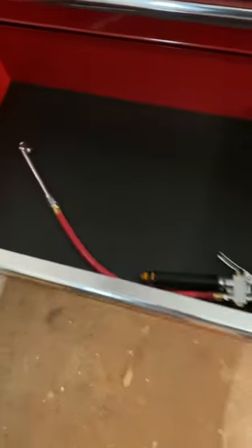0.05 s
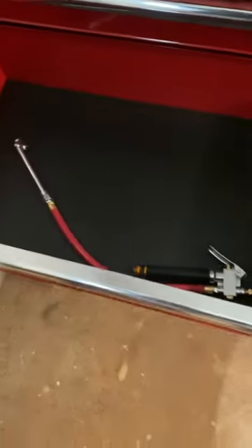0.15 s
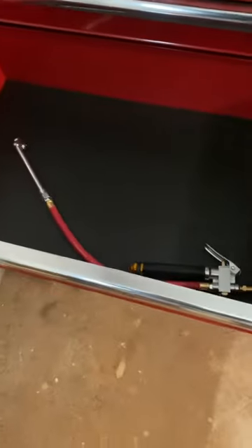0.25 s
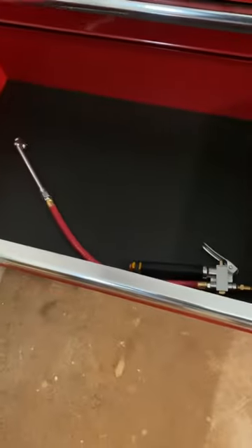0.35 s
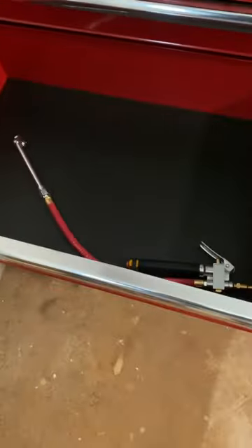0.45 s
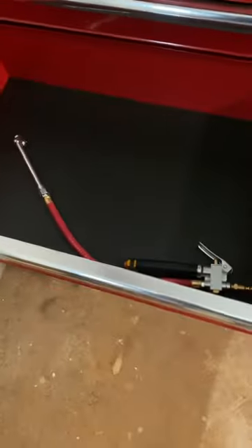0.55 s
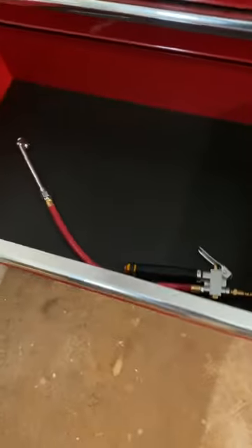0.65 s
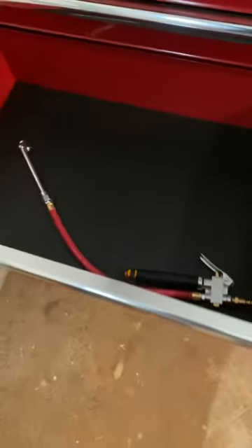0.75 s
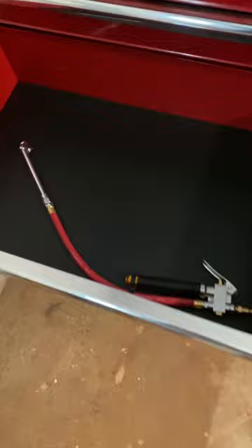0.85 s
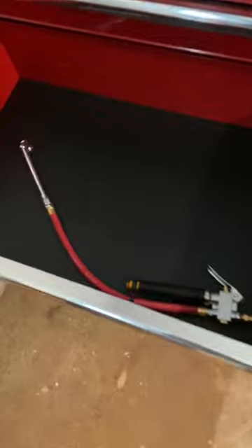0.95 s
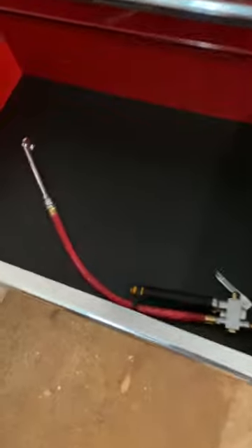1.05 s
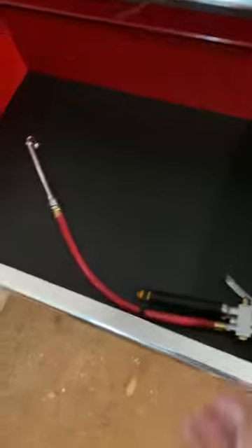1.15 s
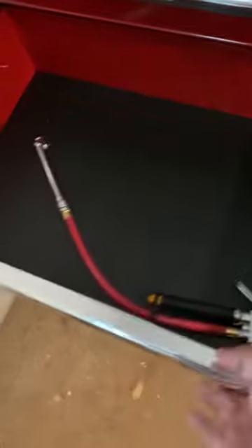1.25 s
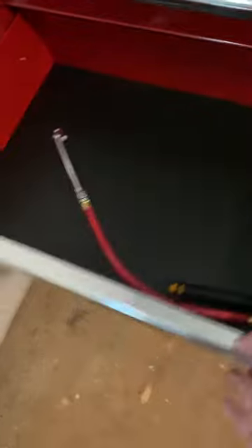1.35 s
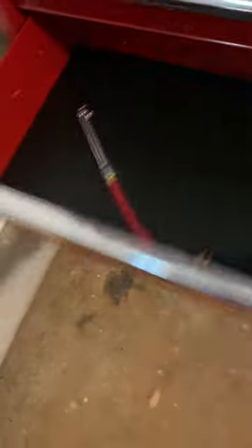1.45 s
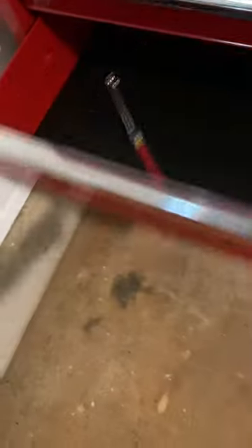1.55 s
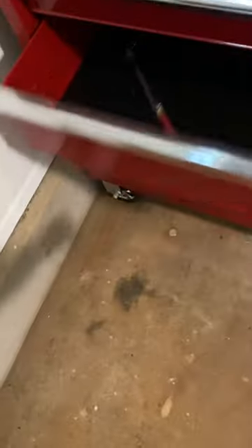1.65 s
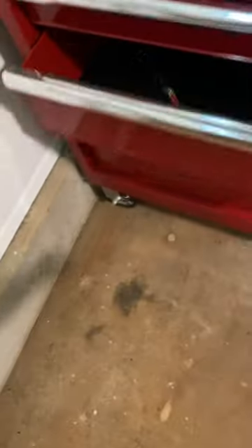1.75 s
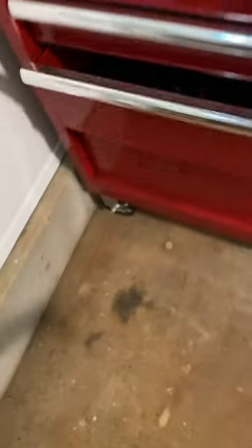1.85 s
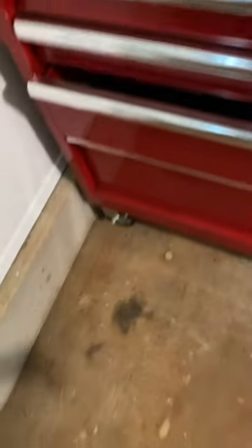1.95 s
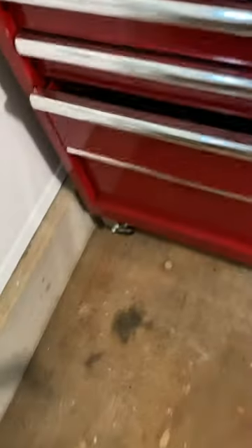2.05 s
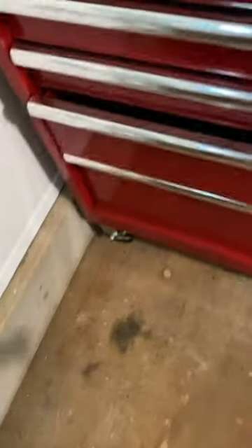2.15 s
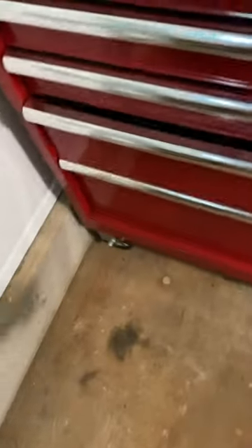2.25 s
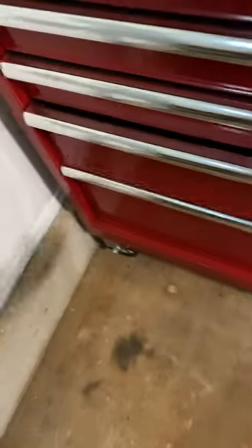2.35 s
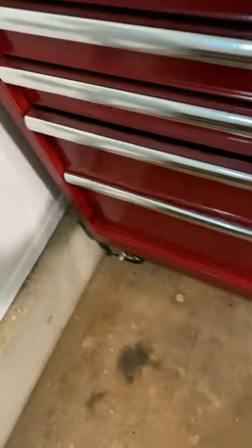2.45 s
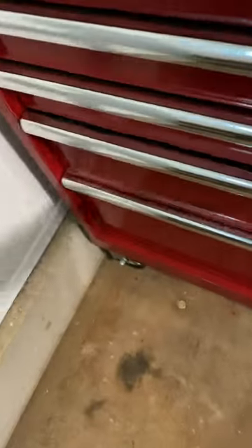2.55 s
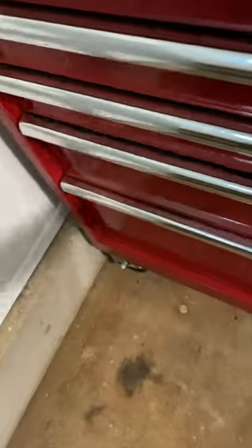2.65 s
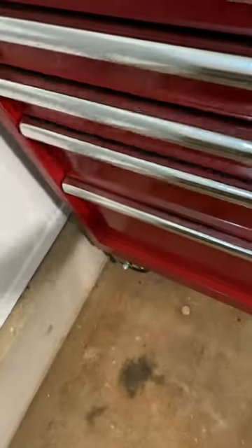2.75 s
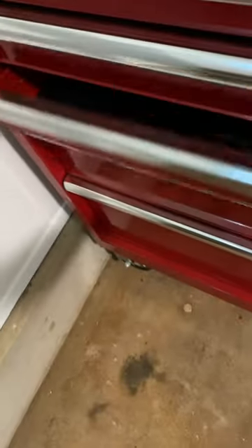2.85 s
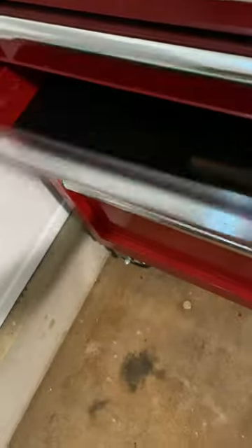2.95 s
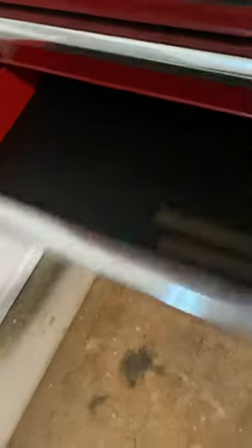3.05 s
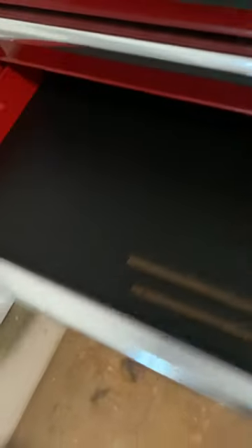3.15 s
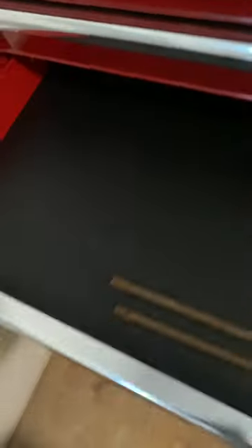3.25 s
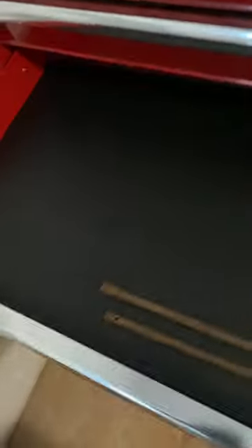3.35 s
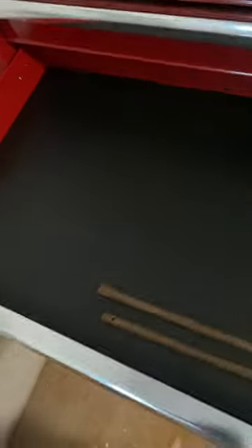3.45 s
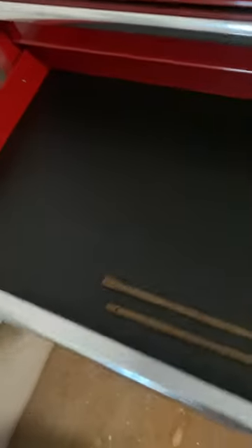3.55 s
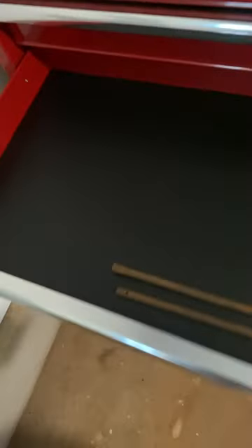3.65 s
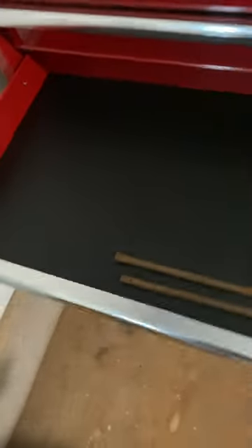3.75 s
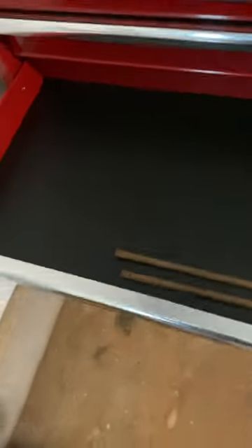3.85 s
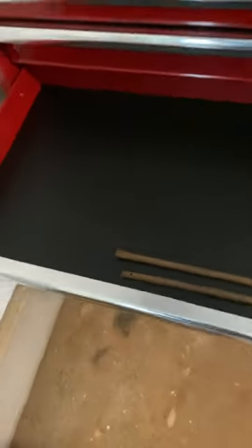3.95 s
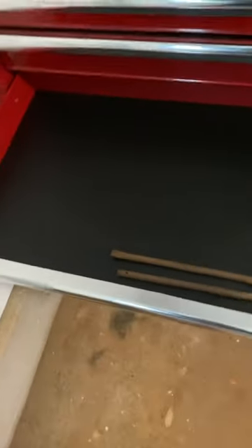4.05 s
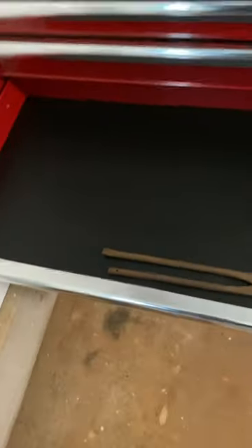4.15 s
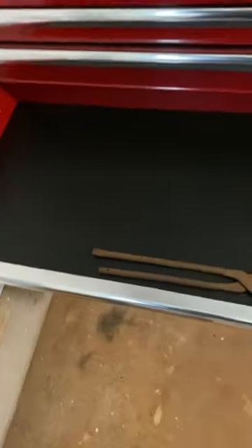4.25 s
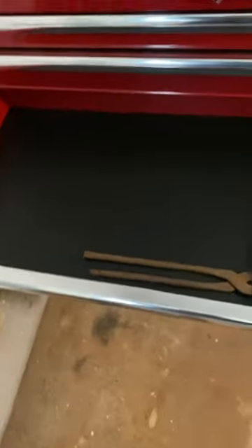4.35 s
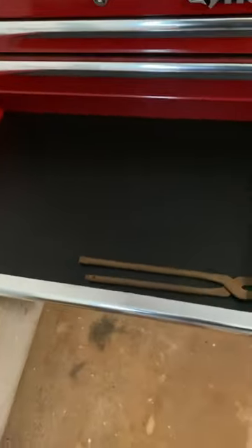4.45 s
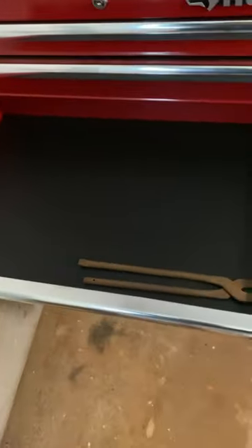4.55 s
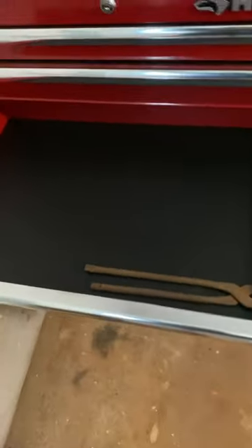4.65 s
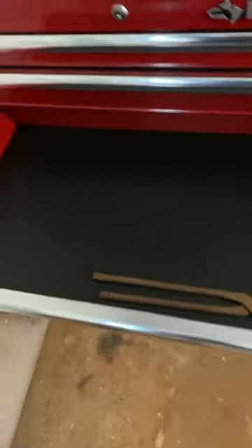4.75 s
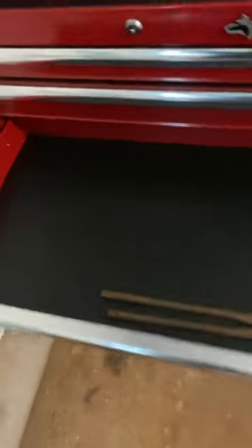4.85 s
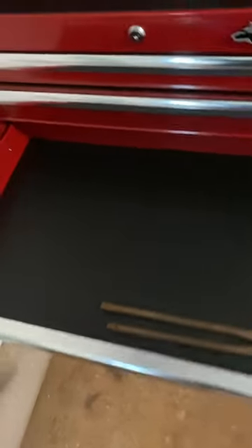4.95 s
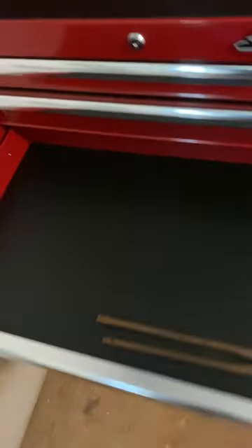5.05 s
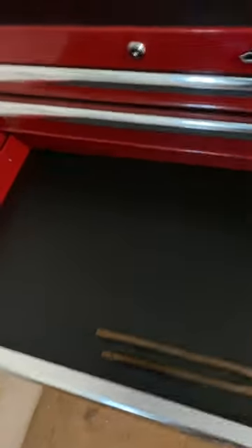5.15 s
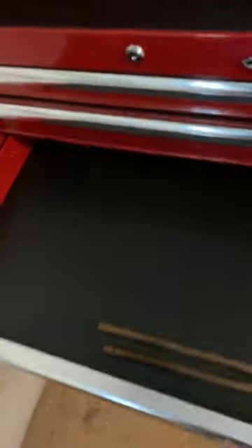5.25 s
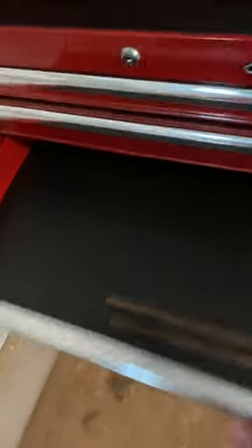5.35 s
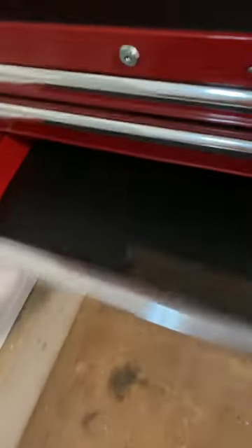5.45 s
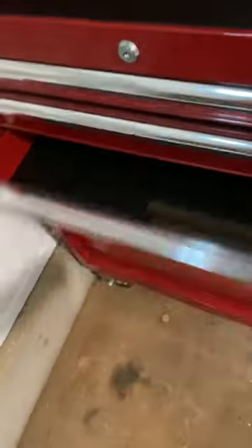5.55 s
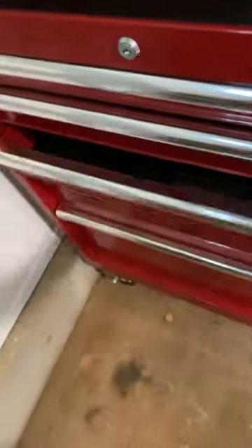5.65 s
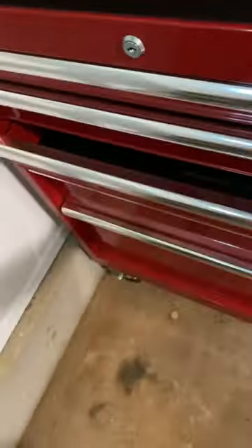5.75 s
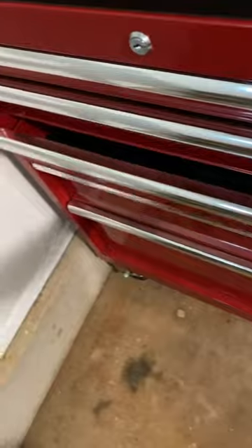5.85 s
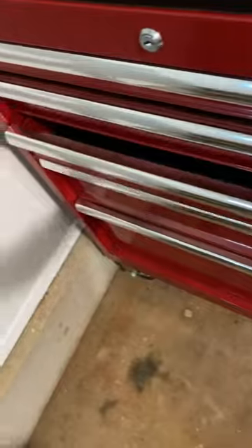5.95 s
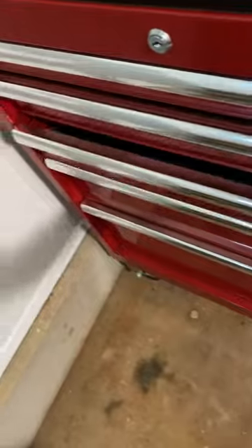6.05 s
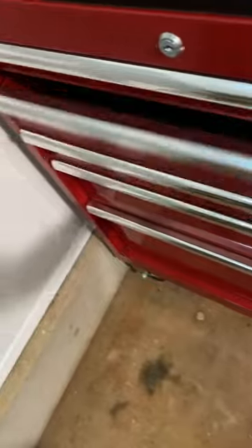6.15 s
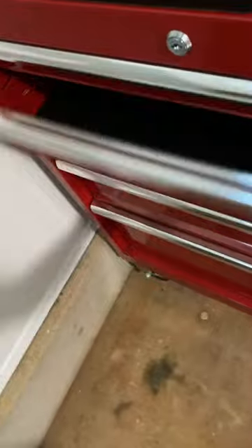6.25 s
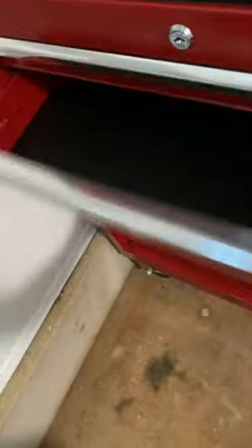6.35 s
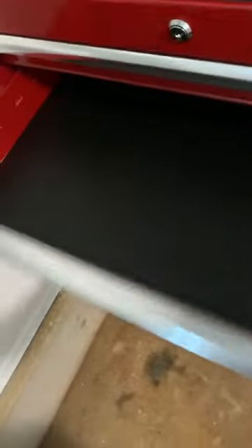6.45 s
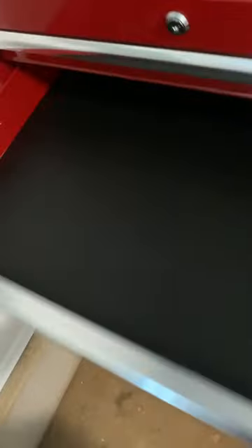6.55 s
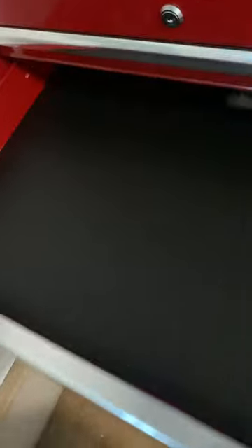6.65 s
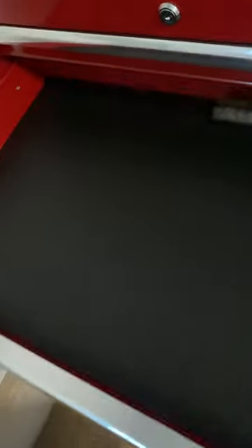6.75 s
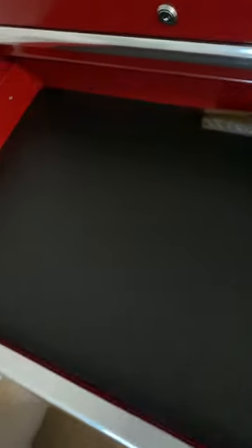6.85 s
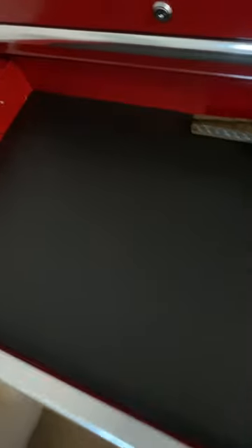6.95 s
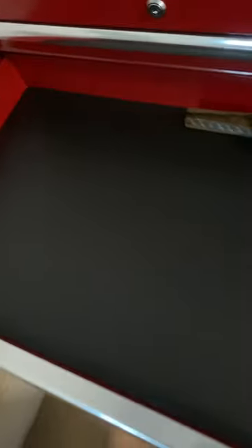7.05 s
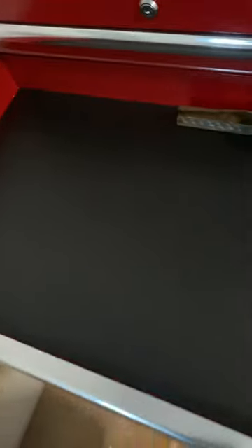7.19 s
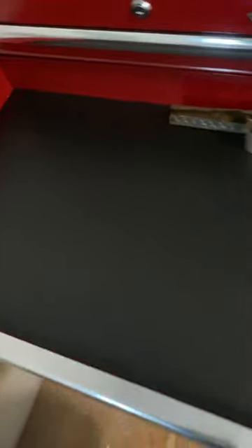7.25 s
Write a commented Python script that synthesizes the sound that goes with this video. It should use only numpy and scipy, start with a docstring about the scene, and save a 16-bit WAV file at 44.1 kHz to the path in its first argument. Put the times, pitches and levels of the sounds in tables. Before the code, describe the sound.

A steel tool chest heard close up in a reverberant garage, over faint still air and a low hum. The first second is nearly quiet, with a tiny knock at 0.1 s and a dry tick at 0.7. From about 1.2 s a latch clicks and a drawer rolls shut, ball slides hissing and thin panels humming, ending in a bright clack and hollow boom at 1.8. Small rattling ticks follow at 2.2-2.5. At 2.7 another drawer rolls open quickly, hitting its stop with a thud near 3.05, then a clack at 3.4. Quiet until 5, with light ticks and soft gritty shoe scuffs at 3.8, 4.7 and 5. From 5.1 the drawer rolls back, its steel singing, and slams hard at 5.6. Clicks at 5.9-6.05 lead into a rattly pull open, stopping with a hollow bang at 6.5. Loose metal clacks and ticks around 6.8-7.05 s fade out.

```python
"""In a hard-walled garage, the steel drawers of a tool chest roll in and out on ball slides, heard close by.
Rolling balls shake the sheet-steel panels (ringing filters) and hiss (coloured random clicks).
Slide stops, latches and loose tools clack in short rattles, dry ticks and single blows.
Shoes scuff the concrete. The cabinet booms, the room rings on in a fading noise tail,
and still air and a faint hum (wavering sines) lie under everything."""
import sys
import numpy as np
from scipy import signal
from scipy.fft import rfft, irfft, next_fast_len
from scipy.io import wavfile

SR = 44100
rng = np.random.default_rng(int(sys.argv[2]) if len(sys.argv) > 2 else 0)


def generate_wav(signal):
    """Clip the signal to [-1, 1] and save it as 16-bit WAV at the path in sys.argv[1]."""
    frames = np.transpose(np.atleast_2d(signal))
    scaled = np.clip(frames, -1, 1) * 32767
    pcm = np.round(scaled).astype(np.int16)
    wavfile.write(sys.argv[1], SR, pcm)


N = 322812  # length of the scene in samples

# rattling contacts of steel on steel, with relative levels: start_s [s], click_db (bright click) [dB],
# snap_db (very high snap) [dB], crunch_db (lower crunch) [dB]
CONTACTS = [(0.097, -54, -79, -48.5), (1.155, -54, -67, -64), (1.2213, -36, -63, -57),
            (1.256, -35, -62, -58), (1.314, -35, -54, -50), (1.3403, -32.5, -62, -53),
            (1.482, -36.5, -81, -63), (1.571, -38, -68, -54), (1.6457, -27.5, -42, -37),
            (1.8042, -26, -49, -38.5), (1.8172, -16, -32, -28), (1.825, -19, -43, -29.5),
            (1.834, -33, -54, -27.5), (2.196, -50, -49, -49), (2.212, -44, -63, -56),
            (2.226, -42, -58, -54), (2.236, -37, -46, -48), (2.2467, -26, -56, -51),
            (2.524, -32.5, -75, -42), (2.7019, -29, -57, -39.5), (2.7122, -34, -54, -36.5),
            (2.8695, -28.5, -62, -39), (2.8835, -49, -63, -45), (3.027, -26.5, -54, -31.5),
            (3.0404, -51, -62, -49), (3.1235, -68, -43, -56), (3.3723, -31.5, -63, -39),
            (3.4422, -46, -72, -53), (3.501, -37, -64, -52.5), (4.036, -33.5, -60, -48.5),
            (4.048, -32, -53, -39), (4.9545, -49, -66, -52), (5.0843, -52, -67, -55),
            (5.439, -29, -48, -41), (5.496, -31, -60, -60), (5.544, -34, -51, -36.5),
            (5.602, -13.5, -46, -31), (5.6066, -11, -49, -37), (5.6112, -16.5, -53, -22.5),
            (5.9, -32.5, -69, -36.5), (5.912, -38, -58, -41), (6.021, -39, -58, -51),
            (6.0387, -34, -65, -37), (6.06, -15, -53, -33.5), (6.079, -43, -56, -31.5),
            (6.1332, -31, -54, -45), (6.201, -37, -44, -33.5), (6.2134, -18.5, -48, -28),
            (6.351, -42, -68, -40.5), (6.4882, -40, -65, -45), (6.5087, -42, -68, -46),
            (6.786, -46, -51, -51), (6.9514, -31, -50, -57), (6.9658, -26, -37, -38),
            (7.006, -31, -44, -49), (7.0293, -25.5, -63, -36), (7.0444, -53, -64, -33),
            (7.0614, -44, -65, -52)]
# drawer speed heard as rolling strength, one list per slide (shut, open, shut, open):
# time_s [s], level_db [dB, relative]
SLIDE_SPEEDS = [
    [(1.15, -80), (1.25, -49), (1.32, -39.5), (1.42, -34.5), (1.52, -36.5), (1.62, -38.5), (1.75, -39.5),
     (1.83, -40.5)],
    [(2.68, -61), (2.71, -46), (2.78, -44.5), (2.88, -40.5), (2.96, -42), (3.036, -40)],
    [(5.09, -76), (5.16, -56), (5.23, -41.5), (5.29, -44), (5.36, -39), (5.45, -37), (5.53, -36),
     (5.612, -35)],
    [(6.05, -43), (6.07, -37.5), (6.13, -38.5), (6.214, -34.5), (6.27, -40), (6.42, -39), (6.519, -37.5)],
]


def from_db(db):
    """Turn decibels into a gain."""
    return 10 ** (np.asarray(db) / 20)


def rms_one(x):
    """Scale a signal so that its average strength (rms) is 1."""
    return x / np.sqrt(np.mean(x ** 2) + 1e-20)


def in_time(rows):
    """Draw every column as a curve over all samples; outside the rows it is silent (-200 dB)."""
    times_s, *columns = np.transpose(rows)
    return [np.interp(np.arange(N) / SR, times_s, column, -200, -200) for column in columns]


def at_hz(points, hz):
    """Read the second column of a table at any pitch, on a log-frequency axis."""
    table = np.array(points)
    return np.interp(np.log(hz), np.log(table[:, 0]), table[:, 1])


def drift(rate_hz):
    """Smooth random wandering with spread 1: noise through two equal low-pass poles, one value per 40 samples."""
    pole = np.exp(-2 * np.pi * rate_hz * 40 / SR)
    noise = rng.standard_normal(N // 40 + 2002)
    slow = signal.lfilter([1], [1, -2 * pole, pole * pole], noise)[2000:]  # skip the filter's start
    return np.interp(np.arange(N) / 40, np.arange(len(slow)), rms_one(slow))


def ring(force, hz, t60_s):
    """One vibration mode: a unit click starts a sine of height 1 that fades by 60 dB in t60_s."""
    decay = from_db(-60 / (t60_s * SR))
    turn = 2 * np.pi * hz / SR
    return signal.lfilter([0, np.sin(turn)], [1, -2 * decay * np.cos(turn), decay * decay], force + 1e-18)


def coloured(x, spectrum):
    """Minimum-phase filter with the table's spectrum; white input keeps its power."""
    size = next_fast_len(N + 8192)
    filter_hz = np.maximum(np.arange(2049) * SR / 4096, 1)
    log_gain = np.log(from_db(at_hz(spectrum, filter_hz)))
    # folding the cepstrum forward in time puts the filter's energy as early as possible
    folded = irfft(log_gain) * np.r_[1, 2 * np.ones(2047), 1, np.zeros(2047)]
    response = irfft(np.exp(rfft(folded)))
    response = response / np.sqrt(np.sum(response ** 2))
    return irfft(rfft(x, size) * rfft(response, size), size)[:N]


def grains(per_s, spread_db):
    """Random clicks of uneven size and sign, scaled to rms 1."""
    sizes = from_db(spread_db * np.minimum(rng.exponential(1, N), 4)) * rng.choice([-1, 1], N)
    return rms_one(sizes * (rng.random(N) < per_s / SR))


def swell(rise_s, dying_s):
    """A loudness shape with a straight rise and an exponential fall."""
    t = np.arange(round(.25 * SR)) / SR
    rise = np.minimum(t / max(rise_s, 2e-4), 1)
    return rise * np.exp(-np.maximum(t - rise_s, 0) / max(dying_s, 1e-3))


def laid_out(shapes, level_db):
    """Place all (start sample, shape) pairs on one time line, each at its own level."""
    line = np.zeros(N + SR)
    for (at, shape), gain in zip(shapes, from_db(level_db)):
        line[at:at + len(shape)] += gain * shape
    return line[:N]


def clicks_at(times_s, level_db):
    """Single-sample pushes at the given times."""
    line = np.zeros(N)
    line[np.round(times_s * SR).astype(int)] = from_db(level_db)
    return line


def background():
    """Still air is coloured noise; the hum is a few sines that waver in level."""
    # spectrum of the air: pitch_hz [Hz], level_db [dB per Hz, relative]
    air_spectrum = [(15, -28), (25, -4), (108, -4), (149, -7.5), (180, -2.5), (206, -10), (476, -12.5),
                    (641, -30), (988, -19), (1190, -30), (1740, -49), (7710, -24.5), (16000, -51)]
    # tones of the hum: pitch_hz [Hz], level_db (height of the sine) [dB]
    hum_tones = [(172.3, -92), (479.1, -73.5), (726.7, -112), (963.6, -74), (1798, -82.5)]
    t = np.arange(N) / SR
    hum = sum(from_db(level_db + 1.0 * drift(7.2)) * np.sin(2 * np.pi * (hz * t + rng.random()))
              for hz, level_db in hum_tones)
    return from_db(-60) * coloured(rng.standard_normal(N), air_spectrum) + hum


def rolling_db():
    """Drive of the six parts over time: the powers of rest, rolling slides, dying jolts and hiss swells add up."""
    # All levels here are relative. The six parts, in this order in every table:
    # cabinet boom, side wall, drawer pan, front panel, track, ball hiss.
    # direction of each slide: closing [1 = pushed shut, 0 = pulled open]
    closings = [1, 0, 1, 0]
    # how each slide's rolling reaches the parts when the drawer is home: six part levels [dB]
    home_levels_db = [(-14, 5, -1, -1, -6.5, -10), (12.5, 3, 0.5, -0.5, 0.5, -2.5),
                      (-10, 3, -6.5, -3.5, -1, -8.5), (2.5, 12.5, -0.5, -1, -6.5, -9)]
    # change in each part when the drawer is fully out: six part levels [dB]
    drawn_out_db = [-21, -41, -4.5, 2, 1.5, -4]
    # jolts that leave the chest shaking: start_s [s], then six part start levels [dB]
    shaking_jolts = [(0.0, -50.5, -48.5, -53, -59, -54, -56), (1.828, -35.5, -34.5, -36, -34.5, -40.5, -40),
                     (2.36, -61, -49.5, -65, -68, -76, -67), (2.53, -59, -55, -53, -48, -52, -62),
                     (3.039, -40, -32, -30.5, -30, -29, -42.5), (3.361, -51, -41, -48, -45.5, -44.5, -59),
                     (3.64, -55, -47, -62, -73, -77, -74), (4.05, -60, -59.5, -60, -71, -69, -56),
                     (5.611, -40.5, -30, -29, -33.5, -33, -35.5),
                     (6.518, -49, -38.5, -31.5, -32, -36.5, -47.5),
                     (6.761, -64, -70, -47, -46, -48.5, -56.5), (6.929, -48, -48, -40, -48, -50.5, -48),
                     (7.01, -43, -39.5, -52, -48, -54, -69)]
    # how fast each part settles: six speeds [dB per s]
    settling_db_per_s = [47.5, 62, 70.5, 74, 74, 43.7]
    # each part at rest: six part levels [dB]
    resting_db = [-73, -75, -74.5, -70.5, -80, -64]
    # a weaker share of each jolt dies slowly: six part levels against the jolt [dB]
    lingering_db = [-25.5, -20.5, -33, -27, -26, -24]
    # soft swells of the hiss drive: middle_s [s], half_width_s [s], level_db [dB]
    hiss_swells = [(2.3, 0.13, -51.5), (2.6, 0.087, -59), (2.8, 0.08, -43.5), (4.05, 0.18, -51.5),
                   (4.8, 0.27, -62), (5.1, 0.13, -53), (6.214, 0.025, -36)]
    linger_db_per_s, jolt_rise_s = 17, 0.0042

    t = np.arange(N) / SR
    power = from_db(2 * np.c_[resting_db]) * np.ones(N)  # doubled dB turn gain into power
    for rows, closing, parts_db in zip(SLIDE_SPEEDS, closings, home_levels_db):
        # 0 = drawer home, 1 = fully out
        drawn_out = np.interp(t, [rows[0][0], rows[-1][0]], [closing, 1 - closing])
        slide_db = in_time(rows)[0] + np.c_[list(parts_db)] + np.c_[drawn_out_db] * drawn_out
        power += from_db(2 * slide_db)
    for start_s, *parts_db in shaking_jolts:
        at = round(max(start_s, 0) * SR)
        since = t[:N - at]
        quick = from_db(-2 * np.c_[settling_db_per_s] * since)
        slow = from_db(2 * (np.c_[lingering_db] - linger_db_per_s * since))
        rise = np.minimum(since / jolt_rise_s, 1)
        power[:, at:] += from_db(2 * np.c_[parts_db]) * (quick + slow) * rise
    for middle_s, width_s, level_db in hiss_swells:
        power[5] += from_db(2 * level_db) * np.exp(-((t - middle_s) / width_s) ** 2)
    return 10 * np.log10(power)


def balls():
    """Countless small ball contacts blur to a hiss that flickers and follows the rolling drive."""
    # spectrum of the hiss: pitch_hz [Hz], level_db [dB per Hz, relative]
    hiss_spectrum = [(880, -4.5), (1500, -1), (1610, 1), (2440, -2), (3310, -6), (7240, -2.5),
                     (9100, -11.5), (11900, -29), (16000, -28)]
    level = from_db(rolling_db()[5] - 3.5 + 1.6 * drift(27.0))
    return coloured(level * grains(12000, spread_db=1.5), hiss_spectrum)


def singing_db(hz):
    """Extra drive of one mode while a slide that favours its pitch is rolling."""
    # the panel pitch that each slide makes sing: pitch_hz [Hz], extra_db [dB]
    sung_pitches = [(960, 6.5), (433, 4), (632, 7.5), (433, 5)]
    width_octaves = 0.061
    t = np.arange(N) / SR
    total_db = 0
    for rows, (sung_hz, extra_db) in zip(SLIDE_SPEEDS, sung_pitches):
        closeness = np.exp(-(np.log2(hz / sung_hz) / width_octaves) ** 2)
        is_rolling = (t > rows[0][0]) & (t < rows[-1][0])
        total_db = total_db + extra_db * closeness * is_rolling
    return total_db


def chest(shapes):
    """Rolling, rattles and blows drive the same panel modes; each rattle finds each mode with another strength."""
    # ways the sheet steel rings: pitch_hz [Hz], level_db [dB, relative], t60_s (time to fade by 60 dB) [s]
    steel_modes = [(65.3, 1, 1), (69.7, 6, 0.5), (91, 0.5, 0.21), (119.5, 6, 0.25), (128.4, 1.5, 0.12),
                   (159.4, -2.5, 0.74), (185.4, -5.5, 0.18), (227.8, -0.5, 0.12), (257, -8, 0.052),
                   (287, -1.5, 0.21), (324.3, -0.5, 0.16), (378, 2, 0.074), (436.7, 1, 0.055),
                   (509, -2, 0.091), (574, 2, 0.055), (625, 0, 0.17), (661, -3, 0.21), (739, -0.5, 0.025),
                   (834.5, -6, 0.059), (920, -3.5, 0.038), (998.5, -3, 0.035), (1120, -3.5, 0.033),
                   (1232, -1.5, 0.021), (1292, -3.5, 0.021), (1405, -8, 0.055), (1540, -5, 0.011),
                   (1758, -6.5, 0.061), (3580, -11, 0.023), (4190, -19, 0.031), (6440, -22, 0.052)]
    # where the modes of the first five parts end; the latch rings above: top_hz [Hz]
    part_tops_hz = [100, 170, 470, 800, 2000]
    # single blows on one part: start_s [s], level_db [dB, relative],
    # pitch_hz of the modes struck most [Hz], spread_octaves [octaves]
    blows = [(.098, -24, 1270, 0.62), (.104, -32.5, 550, 0.083), (1.167, -34.5, 216, 0.38),
             (1.224, -14, 4000, 0.3), (1.2245, -13, 6250, .1), (1.27, -33, 430, 0.75),
             (1.304, -22.5, 181, 0.11), (1.65, -20.5, 700, 0.69), (1.683, -20.5, 589, .1),
             (1.83, -43, 900, 0.54), (1.838, -15.5, 229, 0.27), (1.874, -19.5, 121, 0.45),
             (2.53, -29.5, 493, 0.97), (2.706, -47, 810, 0.42), (2.749, -27, 65, .2),
             (2.915, -17.5, 420, .15), (3.036, -11.5, 940, 0.16), (3.039, -9.5, 284, 0.61),
             (3.062, -11, 193, 0.14), (3.084, -16.5, 266, 0.8), (3.376, -13.5, 1310, 0.11),
             (3.385, -23, 413, 0.97), (4.934, -36.5, 212, 0.81), (4.955, -50, 700, 0.44),
             (5.101, -32, 153, 0.73), (5.18, -36, 612, 0.048), (5.36, -14, 605.4, 0.052),
             (5.388, -17, 620, 0.059), (5.54, -33, 653, 0.14), (5.618, -9.5, 600, 0.4),
             (5.635, -18.5, 124, 0.7), (5.66, -21, 330, 0.15), (5.903, -28, 710, 0.24),
             (6.065, -15, 1400, 0.052), (6.08, -15, 423, 0.13), (6.093, -21, 130, 0.13),
             (6.169, -23, 125, .14), (6.134, -18.5, 1800, 0.12), (6.22, -31, 706, 0.46),
             (6.522, -13, 388, 0.33), (6.569, -19.5, 328, 0.63), (6.999, -25.5, 109, 0.47),
             (7.033, -37, 970, 0.19), (7.047, -30, 630, 0.12)]
    parts_db = rolling_db()
    knock_db = np.array(CONTACTS)[:, -1] + 1.17   # a harder crunch knocks the panels harder
    blow_s, blow_db, blow_hz, octaves = np.transpose(blows)
    # rolling pushes are too soft to drive higher modes well, so they are low-passed at 1464 Hz
    soften = signal.butter(6, 1464, fs=SR, output="sos")
    bumps = signal.sosfilt(soften, [grains(1500, spread_db=3.5) for _ in range(3)])
    chatter = grains(5000, spread_db=1.5)
    luck_db = rng.normal(0, 2.5, (len(CONTACTS), len(steel_modes)))
    out = np.zeros(N)
    for k, (hz, level_db, t60_s) in enumerate(steel_modes):
        # each mode's drive wanders slowly and at random by a few dB
        part_db = parts_db[np.searchsorted(part_tops_hz, hz)]
        force = from_db(part_db + singing_db(hz) + 2.5 * drift(5.4) - 7.0) * bumps[k % 3]
        if part_tops_hz[3] < hz < part_tops_hz[4]:   # light rattles move only the small panels
            force = force + from_db(-8) * chatter * laid_out(shapes, knock_db + luck_db[:, k])
        # a blow reaches the modes near its pitch; a wide blow gives each of them less
        distance = np.log2(hz / blow_hz) / np.clip(octaves, .05, 1)
        near_db = -6 * distance ** 2 - 10 * np.log10(1 + 10 * octaves)
        struck = (-1) ** k * clicks_at(blow_s, blow_db + near_db)
        # each blow is a brief push, shorter on higher modes
        soft = np.exp(-2 * np.pi * 2 * hz / SR)
        push = signal.lfilter([1 - soft], [1, -soft], struck + 1e-18)
        # steady forces build up in long-ringing modes, so these are fed less
        force = force / np.sqrt(t60_s * SR / 28) + push
        out += from_db(level_db) * ring(force, hz, t60_s)
    return out


def rattles():
    """Each contact is a short rattle that swells and dies, begun 40 samples ahead of its listed time."""
    return [(round(start_s * SR) - 40, swell(rise_s=.0035, dying_s=0.01)) for start_s, *_ in CONTACTS]


def rails(shapes):
    """Steel on steel: one crackle heard as bright click, top snap and crunch, plus the lone ticks."""
    # three spectra, each with pitch_hz [Hz], level_db [dB per Hz, relative]:
    # bright click of a contact or tick
    click_spectrum = [(2060, -26.5), (3500, -10), (3940, -10.5), (4370, -6.5), (4740, -6), (6200, -6.5),
                      (7500, -1.5), (8800, -10.5), (12000, -26), (15600, -38), (22000, -120)]
    # very high snap
    snap_spectrum = [(8000, -6), (10500, -33), (13000, -10), (14500, -15), (16000, -18)]
    # lower crunch
    crunch_spectrum = [(1300, -12), (1800, 0.5), (2500, 2.5), (3600, 1.5), (4600, -1), (6000, -24.5)]
    _, click_db, snap_db, crunch_db = np.transpose(CONTACTS)
    crackle = grains(12000, spread_db=4.0)
    click = from_db(-8) * coloured(crackle * laid_out(shapes, click_db), click_spectrum)
    snap = from_db(-3) * coloured(crackle * laid_out(shapes, snap_db), snap_spectrum)
    crunch = from_db(-3) * coloured(crackle * laid_out(shapes, crunch_db), crunch_spectrum)
    return click + snap + crunch + from_db(9.0) * coloured(ticks(), click_spectrum)


def ticks():
    """Each lone dry tick is a very short noise burst of its own, scaled to equal energy before its level."""
    # lone ticks: start_s [s], level_db [dB, relative]
    tick_times = [(0.7127, -34.5), (1.214, -37), (1.2585, -31), (1.3407, -25), (2.249, -24), (2.2913, -25),
                  (2.71, -22), (3.3754, -20.5), (3.504, -28), (3.657, -47), (3.756, -34.5), (4.043, -25),
                  (4.6648, -31.5), (6.0593, -17), (6.9344, -29.5), (6.9705, -21.5)]
    t = np.arange(round(.006 * SR)) / SR
    bursts = rng.standard_normal((len(tick_times), len(t))) * np.exp(-t / 0.0011)  # dies within a few ms
    bursts = bursts / np.linalg.norm(bursts, axis=1, keepdims=True)
    start_s, level_db = np.transpose(tick_times)
    starts = np.round(start_s * SR).astype(int)
    return laid_out(list(zip(starts, bursts)), level_db)


def scuffs():
    """Grit dragged under a sole on concrete: coloured random clicks that swell and die."""
    # shoe scuffs: start_s [s], rise_s [s], level_db [dB, relative]
    shoe_scuffs = [(3.794, 0.058, -40.5), (4.658, 0.01, -51), (4.72, 0.038, -56.5), (4.974, 0.02, -43)]
    # spectrum of the grit: pitch_hz [Hz], level_db [dB per Hz, relative]
    grit_spectrum = [(180, -49), (300, -34), (855, 6), (1040, -10), (1210, 4), (1650, -3.5), (8050, -7),
                     (15000, -38)]
    shapes = [(round(start_s * SR), swell(rise_s, dying_s=0.03)) for start_s, rise_s, _ in shoe_scuffs]
    level = laid_out(shapes, np.array(shoe_scuffs)[:, 2])
    return coloured(level * grains(2800, spread_db=2.5), grit_spectrum)


def garage(x):
    """Diffuse room tail: octave bands of noise, each dying at its own rate after a short gap."""
    # how long the room rings: pitch_hz [Hz], t60_s (time to fade by 60 dB) [s]
    room_fading = [(60, 1), (250, 1), (1000, 0.99), (3000, 0.73), (7000, 0.49), (14000, 0.32)]
    t = np.arange(round(1.2 * SR)) / SR
    tail = 0
    for low_hz in 40 * 2.0 ** np.arange(9):
        edges_hz = [low_hz, min(2 * low_hz, 19000)]
        octave = signal.butter(2, edges_hz, "band", fs=SR, output="sos")
        band = signal.sosfilt(octave, rng.standard_normal(len(t)))
        tail = tail + band * from_db(-60 * t / at_hz(room_fading, low_hz * np.sqrt(2)))
    tail = tail * np.clip(t / 0.0035 - .3, 0, 1)  # about 1 ms of gap, then a quick rise
    return signal.fftconvolve(x, tail / np.sqrt(np.sum(tail ** 2)))[:N]


def scene():
    """The chest and the feet sound in the garage, over the background."""
    shapes = rattles()
    near = chest(shapes) + rails(shapes) + balls() + scuffs()
    room_db = -11
    return (near + from_db(room_db) * garage(near) + background())[None]


def record(dry):
    """The microphone drops the deepest bass (below 56 Hz); the top is cut steeply towards 16.5 kHz."""
    thin = signal.sosfilt(signal.butter(6, 56, "high", fs=SR, output="sos"), dry)
    return signal.sosfilt(signal.cheby2(12, 70, 16500, fs=SR, output="sos"), thin)


dry = scene()
out = record(dry)
generate_wav(out)
```